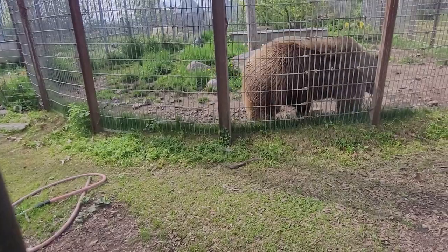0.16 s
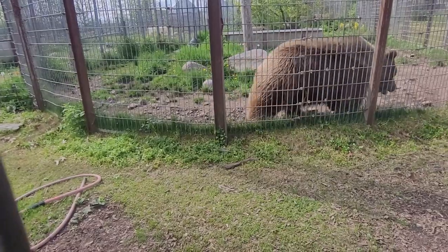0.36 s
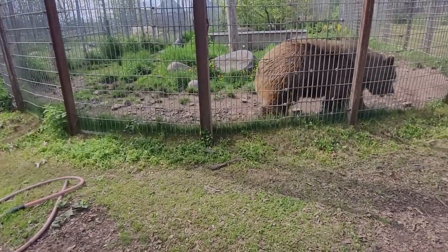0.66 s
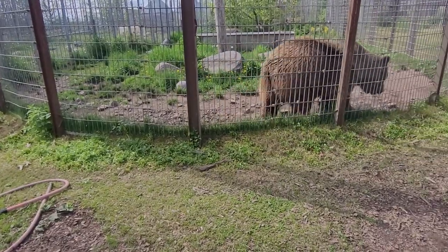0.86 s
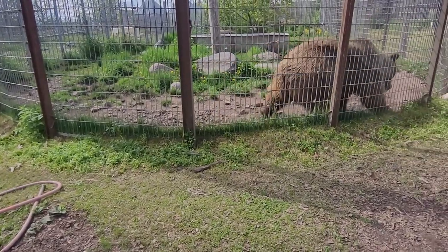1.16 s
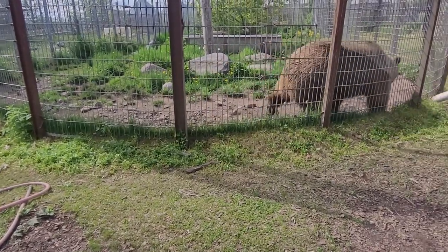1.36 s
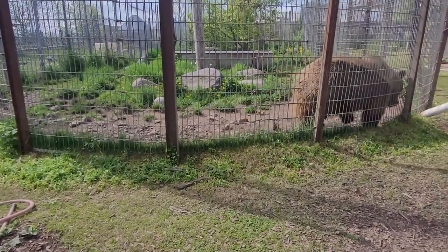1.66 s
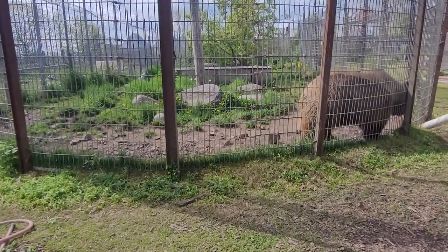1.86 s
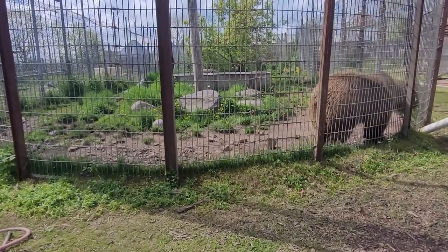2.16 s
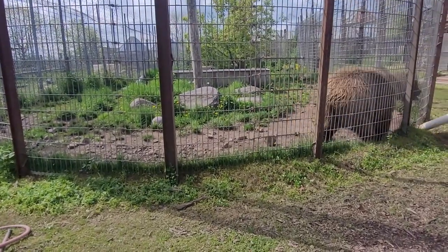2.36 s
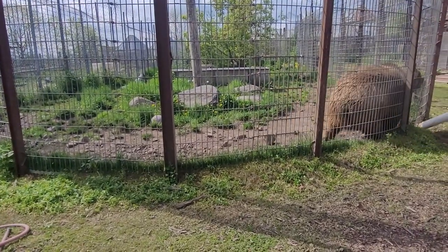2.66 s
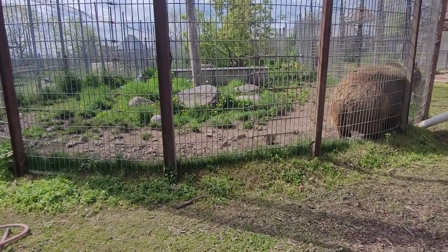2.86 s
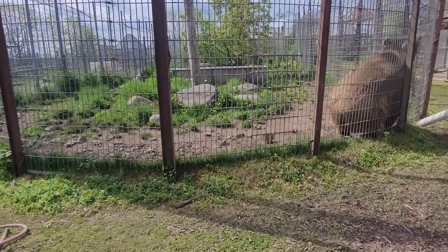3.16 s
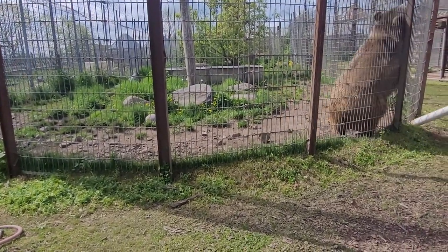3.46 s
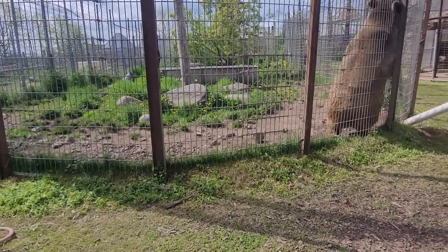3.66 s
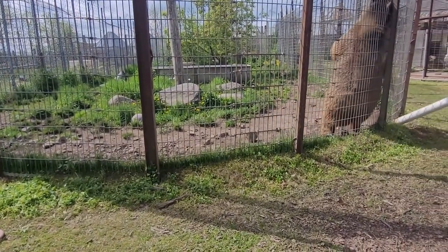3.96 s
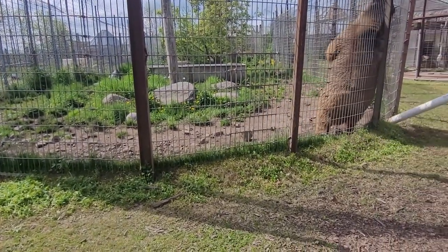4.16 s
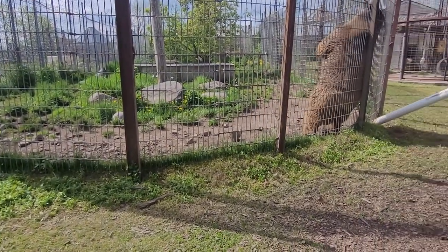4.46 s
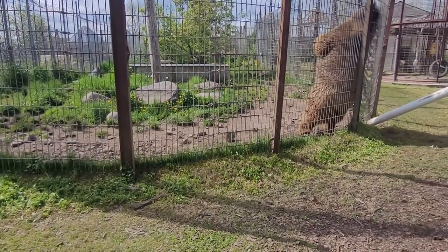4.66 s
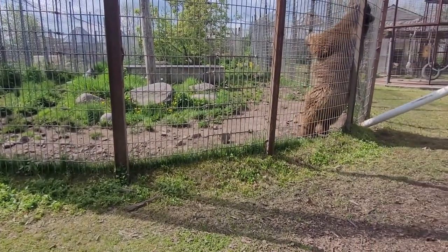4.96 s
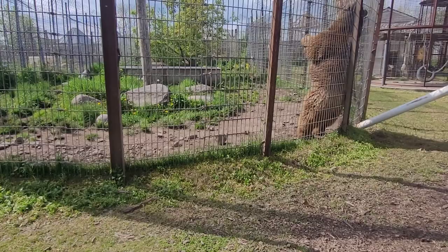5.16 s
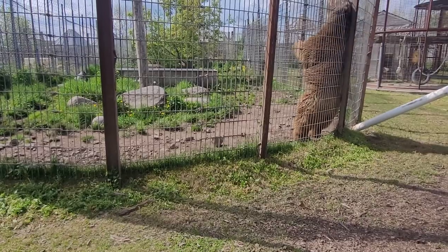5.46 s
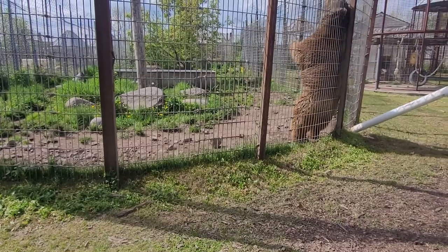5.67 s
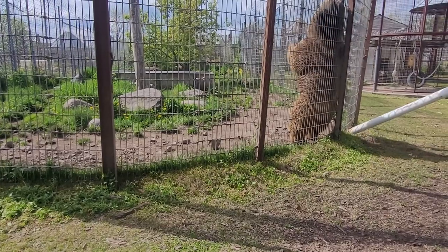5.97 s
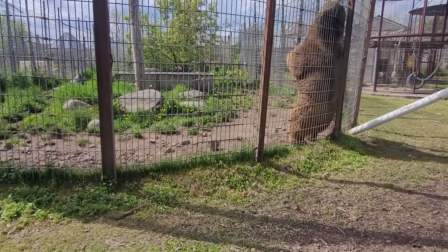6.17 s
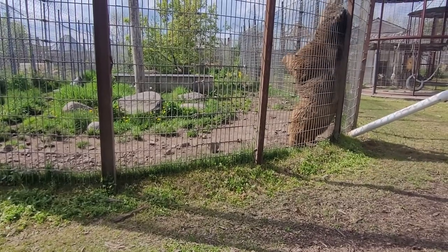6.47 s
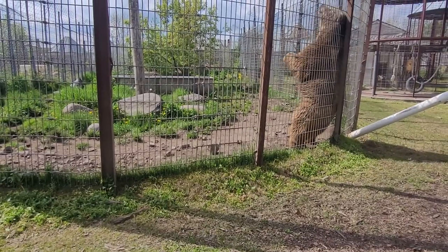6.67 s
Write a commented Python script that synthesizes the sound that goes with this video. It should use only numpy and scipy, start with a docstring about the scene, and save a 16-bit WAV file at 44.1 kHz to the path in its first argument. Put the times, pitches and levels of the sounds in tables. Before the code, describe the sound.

Outdoors, distant songbirds chatter and whistle through quiet open air. Close to the microphone, fingers slide and tap on the case with dull thuds and low grip rumble. A bear rubs a wire-mesh fence, giving thin bright hiss and a light rattle, then jingling clashes late on, the hardest close to the end. The handheld stereo pickup is open on the left and muffled on the right by a palm.

```python
"""Songbirds chatter far off while something, perhaps a bear, rubs a wire-mesh fence; the loudest clashes come late.
Birds and thin wavering tones are gliding sines with echoes; the mesh is colored noise shaped by strokes and clashes.
Fingers slide and tap on the case of a hand-held camera: rough noise and short pushes through resonances.
The left port is open to the air; a palm covers the right one, which gets the air muffled.
The grip adds low rumble to both ports, and the palm thuds and scrapes at the right one."""
import sys
import numpy as np
from scipy import signal
from scipy.fft import rfft, irfft, next_fast_len
from scipy.io import wavfile
from scipy.ndimage import uniform_filter1d, map_coordinates

SR = 44100
rng = np.random.default_rng(int(sys.argv[2]) if len(sys.argv) > 2 else 0)


def dump(signal):
    """Clip the signal to [-1, 1] and save it as 16-bit WAV at the path in sys.argv[1]."""
    limited = np.clip(np.atleast_2d(signal).T, -1, 1)
    pcm = np.round(limited * 32767).astype(np.int16)
    wavfile.write(sys.argv[1], SR, pcm)


N = 300837  # length in samples


def amp(db):
    """Turn decibels into a gain."""
    return 10 ** (np.asarray(db) / 20)


def unit(x):
    """Scale a sound to an average strength (rms) of 1."""
    return x / np.sqrt(np.mean(x ** 2) + 1e-20)


def along(points, hz):
    """Read (Hz, dB) points as a gain at any pitch, on a log pitch axis."""
    f, v = np.transpose(points)
    return amp(np.interp(np.log(hz + 1), np.log(f + 1), v))


def level_curve(rows):
    """Join (s, dB) points with straight lines in dB and return a gain for every sample."""
    s, db = np.transpose(rows)
    return amp(np.interp(np.arange(N) / SR, s, db))


def wobble(rate):
    """Draw a smooth random curve through `rate` random points a second."""
    knots = rng.standard_normal(int(N * rate / SR) + 4)
    return map_coordinates(knots, [np.arange(N) * rate / SR])


def filtered(x, response):
    """Shape a sound by a gain (and phase) that depends on frequency."""
    m = next_fast_len(N + SR // 2)
    return irfft(rfft(x, m) * response(np.fft.rfftfreq(m, 1 / SR)), m)[..., :N]


def grit(spectrum, spread_db):
    """Make dense noise grains of uneven size in one color, rms 1."""
    grains = rng.standard_normal(N) * amp(spread_db * wobble(400))
    return unit(filtered(grains, lambda hz: along(spectrum, hz)))


def steady_noise(spectrum):
    """Make steady noise whose strength at each frequency is given in dB per Hz."""
    return filtered(rng.standard_normal(N), lambda hz: along(spectrum, hz) * np.sqrt(SR / 2))


def note(length, first_hz, mid_hz, last_hz, db, flutter, warble):
    """Make a sine that glides on a parabola through three pitches, with soft ends."""
    u = np.linspace(0, 1, max(int(length * SR), 8))
    hz = first_hz * (1 - u) * (1 - 2 * u)
    hz += 4 * mid_hz * u * (1 - u)
    hz += last_hz * u * (2 * u - 1)
    phase = 2 * np.pi * np.cumsum(hz + warble[:len(u)]) / SR
    soft_ends = np.sqrt(np.sin(np.pi * u).clip(0))
    return amp(db + flutter[:len(u)]) * soft_ends * np.sin(phase)


def play(rows, flutter_db, warble_hz):
    """Play all notes of a table, each trembling in level and pitch."""
    out = np.zeros(N + SR)
    shake = np.pad([flutter_db * wobble(60), warble_hz * wobble(40)], ((0, 0), (0, SR)))
    for s, *shape in rows:
        at = round(s * SR)
        tone = note(*shape, *shake[:, at:])
        out[at:at + len(tone)] += tone
    return out[:N]


def glides(rows, arch_hz_per_s):
    """Turn middle pitch and glide into three pitches; the ends of longer notes hang lower."""
    notes = []
    for s, length, hz, glide, db in rows:
        droop = arch_hz_per_s * length
        notes.append((s, length, hz - glide / 2 - droop, hz, hz + glide / 2 - droop, db))
    return notes


def outdoors(x, t60, wet_db):
    """Add the scattered echoes of trees and sheds as noise that falls 60 dB in t60 seconds."""
    t = np.arange(SR // 2) / SR
    tail = rng.standard_normal(len(t)) * amp(-60 * t / t60)
    return x + amp(wet_db) * signal.fftconvolve(x, tail / np.linalg.norm(tail))[:N]


def strokes(rows, edge, lean=0.24):
    """Make gains that swell quickly and fade slowly, one row of samples for each dB column."""
    out = np.zeros((len(rows[0]) - 2, N + SR))
    for s, length, *db in rows:
        u = np.linspace(0, 1, int(length * SR * 1.3))  # the fade outlasts the listed length
        swell = np.sin(np.pi * u ** lean).clip(0) ** edge  # a small lean moves the peak earlier
        out[:, round(s * SR):][:, :len(u)] += amp(db)[:, None] * swell
    return out[:, :N]


def mode(hz, width_hz):
    """Give the response of one resonance: strongest at hz, and wide ones die sooner."""
    return lambda f: 1j * f * width_hz / (hz * hz - f * f + 1j * f * width_hz)


def rubbed(table, gains, rough_db):
    """Skin slips unevenly and drives each resonance at its own strength."""
    skin = rng.standard_normal(N) * amp(rough_db * wobble(60))
    out = np.zeros(N)
    for row, gain in zip(table, gains):
        tone = filtered(skin, lambda f: mode(*row)(f) ** 3)  # cubed: a narrower band
        out += gain * unit(tone)
    return out


def struck(table, levels_db, blows):
    """Short pushes ring each resonance."""
    def response(f):
        return sum(amp(db) * mode(*row)(f) for row, db in zip(table, levels_db))
    return filtered(blows, response)


# noise of the open air before its slow wavering: pitch_hz, level_db (dB per Hz)
AIR = [(300, -104), (1000, -113), (2300, -120), (3500, -112), (7000, -127), (11000, -112), (15000, -108)]


def open_air():
    """The air is broad noise whose level wavers slowly."""
    return steady_noise(AIR) * amp(1.5 * wobble(5))


# hiss of the right port: pitch_hz, level_db (dB per Hz)
PORT_HISS = [(300, -116), (3000, -130), (7500, -132), (13500, -123), (15500, -128)]


def port_hiss():
    """The right port has its own steady noise."""
    return steady_noise(PORT_HISS)


# grip and wind on the ports, before the lumps: time_s, level_db
GRIP = [(0.0, -74.5), (1.61, -71), (1.65, -53), (2.73, -71), (4.66, -64), (4.74, -55.5), (4.82, -66.5),
        (5.77, -75.5), (5.87, -55.5), (6.48, -75.5), (6.51, -57.5), (6.82, -63.5)]
# color of the rumble: pitch_hz, relative_level_db (dB per Hz)
RUMBLE = [(12, -59), (28, -19.5), (42, 6), (70, 1), (130, -7.5), (250, -16.5), (500, -53.5)]
# the palm shifts on its port: start_s, length_s (before the longer fade), level_db (before the two gains)
SHIFT = [(1.44, 0.31, -57), (1.64, 0.16, -46), (1.87, 0.23, -55), (3.62, 0.22, -59), (4.35, 0.18, -52.5),
         (5.81, 0.097, -51)]
# resonances of the air pocket under the palm: pitch_hz, width_hz
PALM = [(130, 370), (800, 460)]
THUD_DB, SCRAPE_DB = 0.5, -21.5  # gains of the low and the high pocket resonance


def grip():
    """Lumpy low noise is partly shared by the ports; the shifting palm rubs the pocket at the right one."""
    own_left, own_right, shared = [amp(4.1 * wobble(12)) * grit(RUMBLE, spread_db=1.1) for _ in range(3)]
    rumble = np.array([own_left + 0.5 * shared, own_right + 1.55 * shared])
    gains = amp([[THUD_DB], [SCRAPE_DB]]) * strokes(SHIFT, edge=0.33)
    palm = rubbed(PALM, gains, rough_db=7.0)
    return level_curve(GRIP) * rumble + [0 * palm, palm]


# level of the blur of far birds: time_s, level_db
CHATTER = [(2.3, -76.5), (2.7, -75)]


def chatter():
    """Far birds blur together: 1200 quick falling sweeps at random times, the higher ones louder."""
    draw = rng.random((1200, 3))
    start = draw[:, 0] * N / SR
    length = 0.0155 + 0.029 * draw[:, 2]
    pitch = 3300 + 900 * draw[:, 1]
    rows = np.transpose([start, length, 1.1 * pitch, pitch, .9 * pitch, 9 * draw[:, 1]])
    blur = outdoors(play(rows, flutter_db=4.5, warble_hz=58), t60=0.13, wet_db=4.5)
    return unit(blur) * level_curve(CHATTER)


SONG_ENDS_HZ = 3108  # every phrase glides to this pitch
CHIRP_S, CHIRP_SWEEP_HZ = .025, 707  # average length and pitch sweep of a chirp
SCATTER = 0.0816  # largest offset of a chirp from the glide, as a share of its pitch


def syllables(s, length, first_hz, db):
    """A phrase is a dozen quick steep chirps scattered about its glide, swelling and fading."""
    draw = rng.random((12, 3))
    u = (np.arange(12) + .5) / 12
    glide = first_hz + (SONG_ENDS_HZ - first_hz) * u
    hz = glide * (1 + SCATTER * (2 * draw[:, 0] - 1))
    direction = np.where(draw[:, 0] < .25, 1, -1)  # most chirps fall
    half_sweep = CHIRP_SWEEP_HZ * (.3 + .4 * draw[:, 1]) * direction
    lengths = CHIRP_S * (.5 + draw[:, 2])
    levels = db + 10 * np.log10(np.sin(np.pi * u))
    return np.transpose([s + length * u, lengths, hz - half_sweep, hz, hz + half_sweep, levels])


# warbled phrases that sink: start_s, length_s, first_pitch_hz, level_db
SONG = [(0.149, 0.33, 3710, -69.5), (0.539, 0.11, 4320, -71), (0.674, 0.039, 4263, -70),
        (0.842, 0.11, 4160, -71), (1.004, 0.057, 4180, -71), (1.147, 0.16, 4140, -69),
        (1.561, 0.09, 4120, -67), (1.725, 0.31, 3640, -67.5), (2.145, 0.095, 3895, -71.5),
        (2.457, 0.085, 3310, -69), (4.435, 0.042, 3360, -74.5), (4.544, 0.12, 4730, -68.5)]


def song():
    """Warbled phrases are strings of short chirps, with echoes."""
    chirps = np.vstack([syllables(*row) for row in SONG])
    return outdoors(play(chirps, flutter_db=4.5, warble_hz=60), t60=0.38, wet_db=5)


# clear whistled notes: start_s, length_s, middle_pitch_hz, glide_hz, level_db
WHISTLES = [(.1, 0.26, 2487, -250, -72), (.57, 0.1, 2510, -400, -74), (1.35, 0.16, 2500, 108, -74.5),
            (1.98, 0.15, 2570, -200, -69.5), (2.13, 0.098, 2290, -42, -74.5),
            (2.63, 0.062, 3126, 505, -63.5), (2.71, .12, 3070, -250, -73), (3.035, .04, 3100, 305, -61),
            (3.16, 0.077, 3190, -200, -69.5), (3.4, 0.088, 2340, 0, -74.5),
            (2.58, 0.065, 2286, -150, -72.5), (3.05, 0.077, 2750, -77, -69.5),
            (4.4, 0.03, 4040, 450, -58.5), (4.61, 0.14, 2516, 56, -64), (4.175, 0.048, 3410, 897, -64.5),
            (4.265, 0.021, 3300, -500, -64.5), (4.97, 0.033, 3280, -500, -66),
            (5.135, 0.062, 3340, -700, -66.5), (5.26, 0.029, 3960, 310, -64.5),
            (6.32, 0.13, 2510, 196, -65)]
ARCH_HZ_PER_S = 1900  # how far the ends hang under the middle, per second of length


def whistles():
    """Clear whistles are single sines on an arched glide, with echoes."""
    notes = glides(WHISTLES, ARCH_HZ_PER_S)
    return outdoors(play(notes, flutter_db=3.0, warble_hz=44.8), t60=0.4, wet_db=-1.5)


# thin wavering tones, perhaps strained wire: start_s, length_s, middle_pitch_hz, glide_hz, level_db
STRAIN = [(4.27, 0.51, 1932, -85, -70), (4.74, 0.26, 1908, 42, -77), (4.78, 0.203, 768, -42, -72),
          (5.32, 0.2, 1388, -34, -73.5)]


def thin_tones():
    """Thin tones, perhaps strained wire, are sines that waver and glide a little."""
    return outdoors(play(glides(STRAIN, 0), flutter_db=3, warble_hz=20), t60=.3, wet_db=-1.5)


# resonances of the camera's case: pitch_hz, width_hz
CASE = [(260, 87), (450, 171), (660, 392), (1480, 260)]
# fingers sliding on the case: start_s, length_s (before the longer fade),
# level_db (before the finger's place counts), place (0 at the edge, .5 in the middle)
SLIDE = [(0.463, 0.21, -57.5, 0.43), (1.006, 0.24, -88, 0.51), (1.31, 0.076, -53.5, 0.23),
         (1.495, 0.068, -55, 0.23), (1.606, 0.28, -51, 0.3), (1.892, 0.16, -52, 0.27),
         (2.361, 0.13, -56.5, 0.45), (2.933, 0.17, -49.5, 0.467), (3.48, 0.35, -59.5, 0.13),
         (3.716, 0.46, -53.5, 0.074), (4.344, 0.18, -63.5, 0.22)]
SLIDE_BRIGHTENS = 0.66  # dB the third resonance gains, and the first loses, per dB over -53.5


def sliding_fingers():
    """Sliding skin drives the lowest three case resonances; each is weak where a finger lies on its still point."""
    k = np.arange(1, 4)
    rows = []
    for s, length, db, place in SLIDE:
        tilt = SLIDE_BRIGHTENS * (db + 53.5) * (k - 2)
        reach_db = 36 * np.log10(abs(np.sin(k * np.pi * place)) + 0.12)
        rows.append((s, length, *(db + tilt + reach_db)))
    return rubbed(CASE, strokes(rows, edge=2.92, lean=0.77), rough_db=2.5)


# taps on the case: start_s, blow_db, contact_ms
TAPS = [(1.66, -18, 3.26), (1.732, -23.5, 1.12), (1.908, -24.5, 0.93), (1.969, -18, 0.93),
        (3.645, -25.5, 1.94), (5.994, -38.5, 0.82), (6.101, -39.5, 2.7)]
SQUEEZE_DB, SQUEEZE_DB_PER_MS = -26, 6.5  # air pushed under the palm, against the blow; more for a long contact


def taps():
    """Each tap is a short push that rings the case and squeezes the air under the palm."""
    blows = np.zeros((2, N))
    for s, db, contact_ms in TAPS:
        push = np.hanning(int(contact_ms * SR / 1000) + 3)  # a longer contact is duller
        thump_db = db + SQUEEZE_DB + SQUEEZE_DB_PER_MS * contact_ms
        blows[:, round(s * SR):][:, :len(push)] = amp([[db], [thump_db]]) * push / push.sum()
    ring = struck(CASE, [14.6, 37.4, 3.2, 32.2], blows[0])
    thump = struck(PALM, [39, 22], blows[1])
    return ring, thump


def ringing(x, depth_db):
    """Narrow bands stand out for a while, as single wires ring up and die."""
    z = signal.stft(x, nperseg=512)[2]
    wires = uniform_filter1d(rng.standard_normal(z.shape), size=2, axis=0)  # across pitch
    wires = uniform_filter1d(wires, size=24, axis=1)  # across time
    return unit(signal.istft(z * amp(depth_db * unit(wires)), nperseg=512)[1][:N])


# clashes of the mesh on its post, before the flicker:
# start_s, rattle_db, sizzle_db (the thinnest wires)
CLASH = [(3.995, -36, -62), (5.545, -41, -32), (5.609, -34.5, -37.5), (5.815, -25.5, -15.5),
         (6.114, -45, -60), (6.135, -38.5, -73), (6.332, -45, -53), (6.408, -39.5, -62), (6.426, -32, -30),
         (6.442, -22, -23.5), (6.637, -33, -35.5)]
CLASH_T60_S, CLASH_S_PER_DB = 0.25, 0.0033  # 60 dB decay of a -39 dB clash; harder ones last longer


def clash_levels():
    """Each clash rises within milliseconds and dies away; a fast random flicker makes it chatter."""
    shake = np.zeros((2, N + SR))
    t = np.arange(SR // 2) / SR
    for s, *db in CLASH:
        t60 = CLASH_T60_S + CLASH_S_PER_DB * (db[0] + 39.0)
        fade = amp(-60 * np.maximum(t - .008, 0) / t60) * (1 - np.exp(-t / 0.0055))
        shake[:, round(s * SR):][:, :len(t)] += amp(db)[:, None] * fade
    return shake[:, :N] * amp(2.2 * wobble(150))


# one wire rings alone: start_s, pitch_hz, level_db, t60_s (time to fall 60 dB)
PING = [(3.757, 14100, -41, .11)]


def wire_ping():
    """A single wire rings as a sine that dies away."""
    t = np.arange(SR // 2) / SR
    out = np.zeros(N)
    for s, hz, db, t60 in PING:
        tone = amp(db - 60 * t / t60) * np.sin(2 * np.pi * hz * t)
        out += np.pad(tone, (round(s * SR), N))[:N]
    return out


# bright rubbing strokes, some likely fingers sliding near the open port, before the flicker:
# start_s, length_s (before the longer fade), jingle_db, panel_db (body of the panel)
RUBS = [(.32, 0.06, -48, -96), (.4, 0.055, -51, -82), (1.31, 0.057, -61.5, -62), (1.5, 0.054, -65.5, -65),
        (1.66, 0.28, -57.5, -62.5), (2.05, 0.26, -66.5, -79), (2.9, 0.27, -59.5, -75),
        (3.48, 0.34, -51.5, -60.5), (3.79, 0.49, -57, -66), (4.3, 0.83, -61.5, -78),
        (4.71, 0.076, -61, -61.5), (5.42, 0.3, -49.5, -105), (5.67, 0.079, -50, -66),
        (6.48, 0.35, -37.5, -53.5)]
# the leaned-on mesh never rests; level before the flicker: time_s, level_db
REST = [(2.8, -84), (3.5, -66), (5.0, -72), (5.25, -79.5), (5.6, -52), (6.08, -53), (6.82, -63.5)]
# bright color of the jingle: pitch_hz, relative_level_db (dB per Hz)
JINGLE = [(2400, -25.5), (4200, -17.5), (5200, -10.5), (6800, -21.5), (8500, -11.5), (9600, -13.5),
          (11000, -6), (12300, -11), (14500, -6), (15850, -2.5)]
# color of the swaying panel: pitch_hz, relative_level_db (dB per Hz)
PANEL = [(300, -33), (680, -0.5), (1000, -5), (1450, -1.5), (2200, -15.5), (3250, -3.5), (4300, -10),
         (9000, -22)]
TAUT_S = 6.42  # from then on the panel is pulled tight and rings higher
TAUT_HZ, TAUT_WIDTH_HZ = 1340, 1180


def mesh():
    """Rubbing strokes hiss and clashes rattle the mesh: bright jingle, thin sizzle and the panel's body."""
    jingle, panel = strokes(RUBS, edge=0.94, lean=0.5)
    rest = level_curve(REST)
    rattle, sizzle = clash_levels()
    jingle_level = np.hypot((jingle + rest) * amp(1.96 * wobble(30)), rattle)
    rubbed_body = (panel + amp(-9.5) * rest) * amp(2.34 * wobble(25))
    body_level = np.hypot(rubbed_body, amp(-21.0) * rattle)

    bright = ringing(grit(JINGLE, spread_db=1.5), depth_db=4)
    thinnest = unit(filtered(grit(JINGLE, spread_db=1.2), mode(14000, width_hz=2000)))
    slack = ringing(grit(PANEL, spread_db=1.0), depth_db=4.0)
    taut = unit(filtered(slack, mode(TAUT_HZ, TAUT_WIDTH_HZ)))
    body = np.where(np.arange(N) < TAUT_S * SR, slack, taut)
    return jingle_level * bright + sizzle * thinnest + body_level * body + wire_ping()


# gain through the palm: pitch_hz, level_db
COVER = [(60, -23.5), (270, -1), (800, -19.5), (3500, -29), (10000, -58), (14000, -52)]


def under_palm(air):
    """The palm dulls the sound, delays it by 0.33 ms and turns its phase a little."""
    return filtered(air, lambda hz: along(COVER, hz) * np.exp(-.3j - 2j * np.pi * hz * 0.00033))


def scene():
    """The covered right port hears the open left one's sound dulled and a little late."""
    ring, thump = taps()
    birds = chatter() + song() + whistles()
    left = open_air() + birds + thin_tones() + sliding_fingers() + ring + mesh()
    right = under_palm(left) + thump + port_hiss()
    return np.array([left, right]) + grip()


TOP_HZ = 15850  # band limit


def record(dry):
    """The camera keeps nothing from its band limit up."""
    return filtered(dry, lambda hz: hz < TOP_HZ)


dry = scene()
out = record(dry)
dump(out)
```